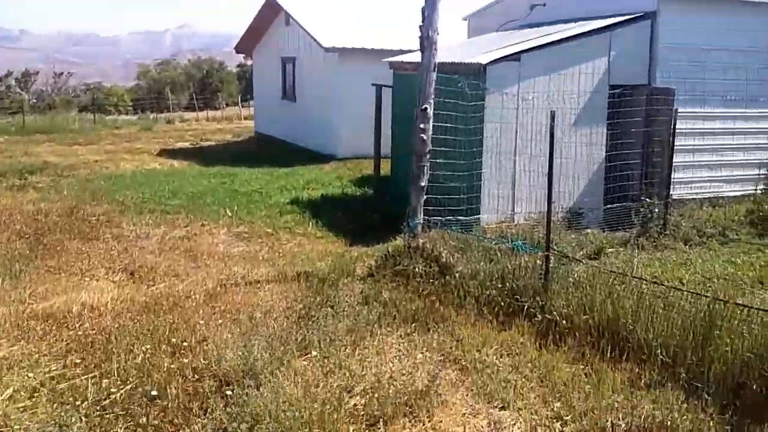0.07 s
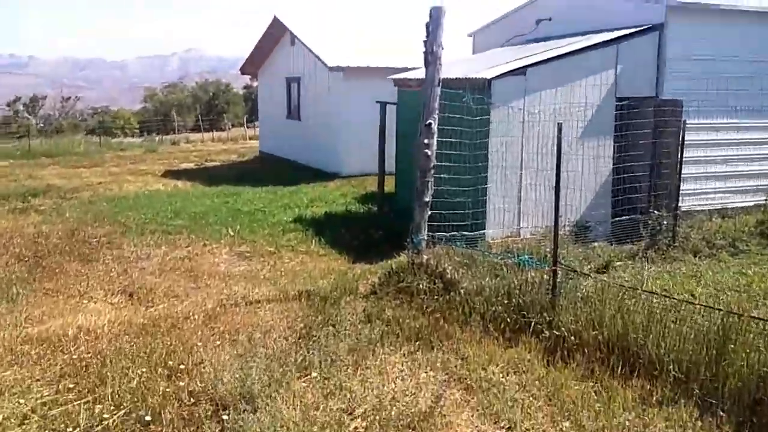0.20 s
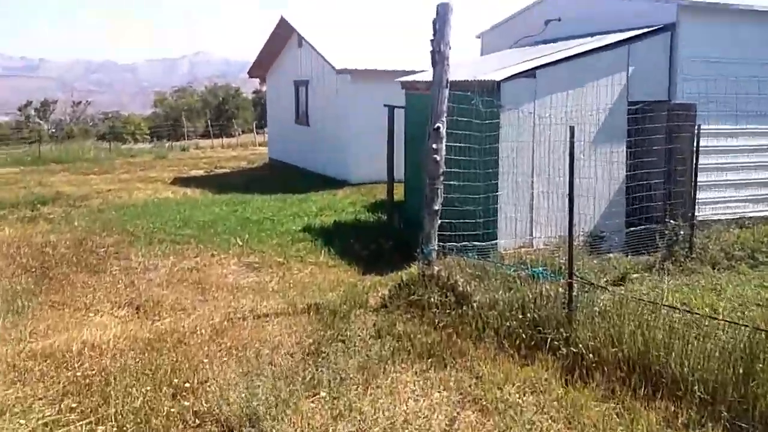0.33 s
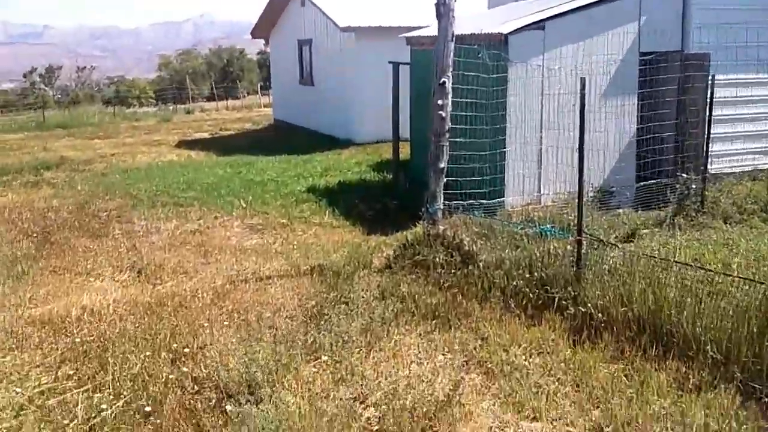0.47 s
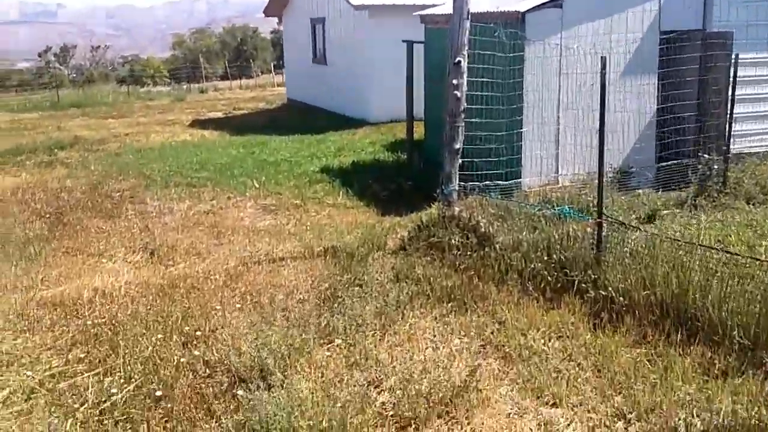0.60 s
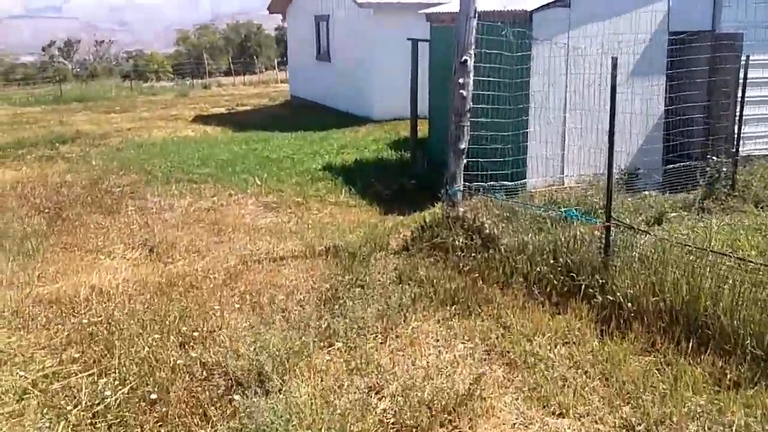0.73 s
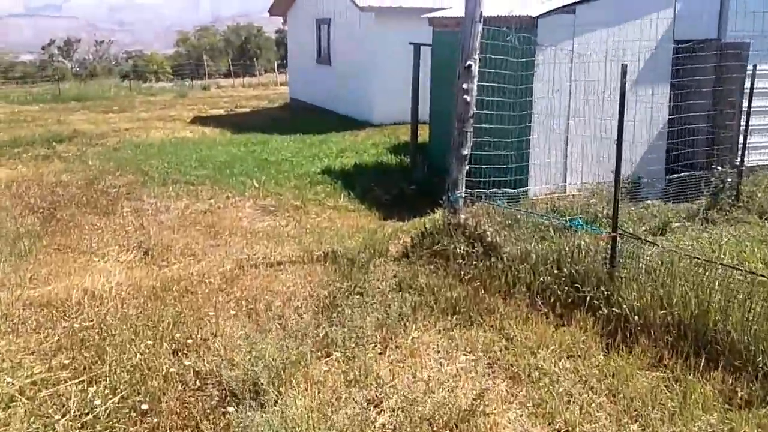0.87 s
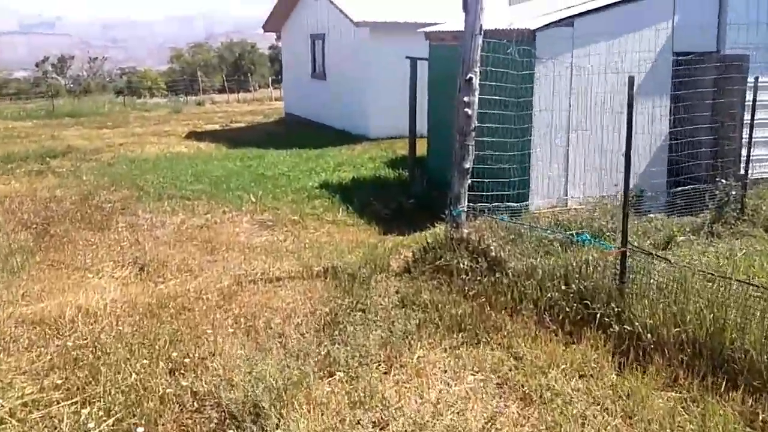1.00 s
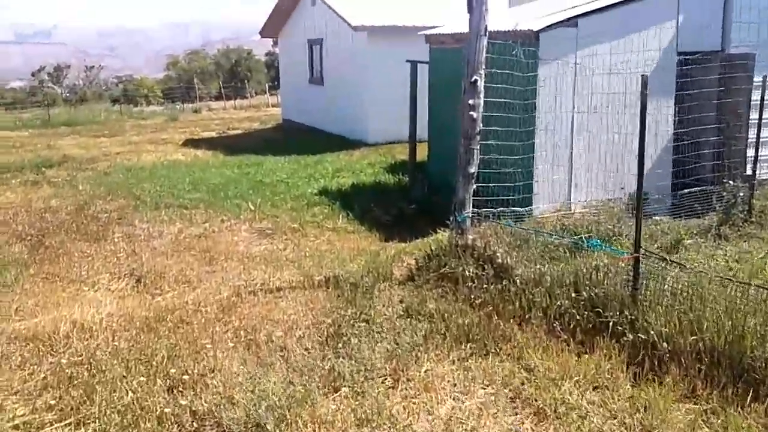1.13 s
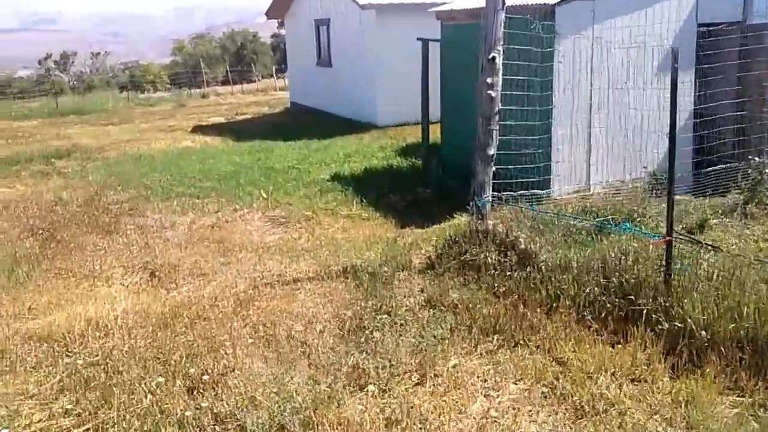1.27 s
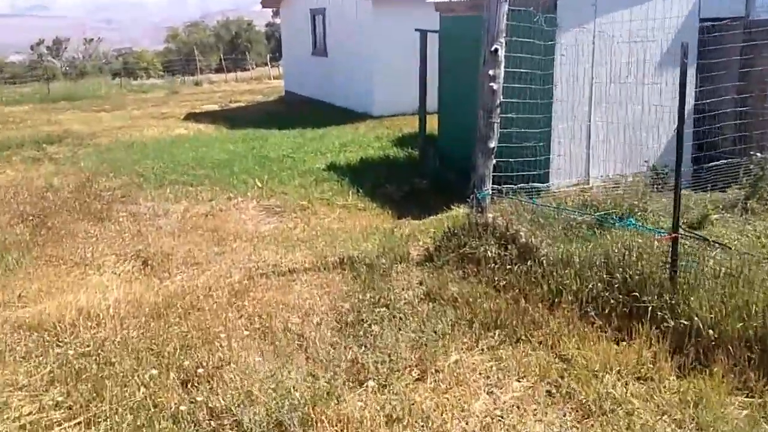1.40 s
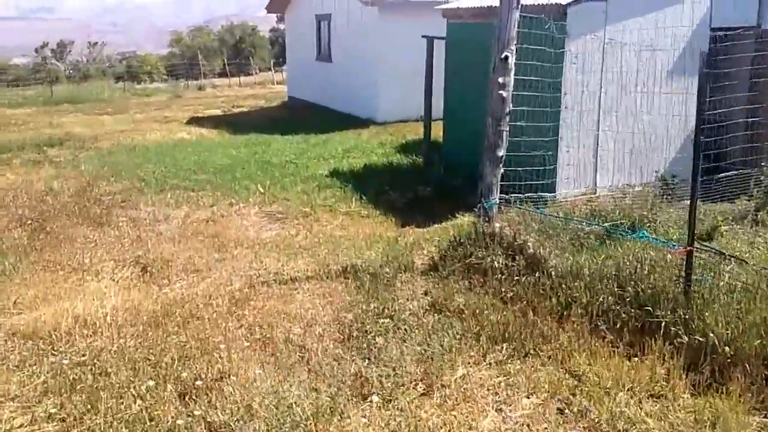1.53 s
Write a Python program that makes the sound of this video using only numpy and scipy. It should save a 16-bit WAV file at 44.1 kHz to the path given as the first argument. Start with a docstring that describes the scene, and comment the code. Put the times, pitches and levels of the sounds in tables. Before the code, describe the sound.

Someone walks through brittle dry grass outdoors, crisp crunches and swishes with soft low bumps

```python
"""An open yard with dry grass: someone walks through it, holding a small camera.
Crunching stems, swishing blades and pressed turf are dense random trains of tiny decaying rings;
snapping stalks and ticking blades are single struck rings with a noisy tearing tail.
The steps bump the camera body in low, sagging pulses, and light wind laps the microphone as low noise.
Far off, a cricket throbs as a noise-modulated tone and a bird gives one rising chirp, over steady air hiss."""
import sys
import numpy as np
from scipy import signal
from scipy.fft import rfft, irfft
from scipy.io import wavfile
from scipy.ndimage import uniform_filter1d

SR = 44100
rng = np.random.default_rng(int(sys.argv[2]) if len(sys.argv) > 2 else 0)


def amplitude_ratio(level_db):
    """Convert a level in decibels to the matching linear amplitude (field) ratio."""
    exponent = np.asarray(level_db, float) / 20
    return 10 ** exponent


def materialize(psi):
    """Save the field psi as 16-bit PCM at rate SR to the path in sys.argv[1].

    A 1-D psi becomes a single channel; in a 2-D psi each row is a channel.
    """
    bounded = np.clip(np.atleast_2d(psi).T, -1, 1)
    quanta = np.round(bounded * 32767).astype(np.int16)
    wavfile.write(sys.argv[1], SR, quanta)


N = 70560

# Spectrum of soles pressing the turf: frequency_hz, density_db (per Hz, relative)
PRESS_SPECTRUM = [(170, -21), (300, -5), (430, -2), (800, 0.5), (1100, -4.5), (1500, -7.5)]
# Spectrum of stems crunching: frequency_hz, density_db (per Hz, relative)
CRUNCH_SPECTRUM = [(700, -13), (1000, -6.5), (1750, 3.5), (2200, 1), (3100, 2), (4000, -4), (4700, -8.5),
                   (5400, -34)]
# Spectrum of blades swishing: frequency_hz, density_db (per Hz, relative)
SWISH_SPECTRUM = [(4300, -19), (5000, -8.5), (5900, -0.5), (7000, -0.5), (7700, -1.5), (9300, -11),
                  (12600, -12.5), (14000, -15.5), (15900, -16)]


def evened(x):
    """Normalisation: scales a signal to unit rms."""
    return x / np.sqrt(np.mean(x ** 2) + 1e-20)


def over_time(table, axis=1):
    """Level envelope: interpolates a dB column linearly in time and turns it into a gain."""
    rows = np.array(table)
    return amplitude_ratio(np.interp(np.arange(N) / SR, rows[:, 0], rows[:, axis]))


def read_spectrum(points, hz):
    """Spectral envelope: interpolates dB over log frequency, with almost nothing outside the points."""
    point_hz, db = np.transpose(points)
    return amplitude_ratio(np.interp(np.log(hz + 1), np.log(point_hz + 1), db, left=-100, right=-100))


def shaped(spectrum, points):
    """Linear filtering: weights a spectrum by an envelope and returns the waveform at unit rms."""
    return evened(irfft(spectrum * read_spectrum(points, np.fft.rfftfreq(N, 1 / SR)), N))


def noise(points):
    """Filtered noise: white Gaussian noise given the spectral envelope."""
    return shaped(rfft(rng.standard_normal(N)), points)


def add(mix, start_s, sound):
    """Superposition: sums a short sound into the mix at its start time."""
    part = mix[max(round(start_s * SR), 0):][:len(sound)]
    part += sound[:len(part)]


def ring(hz, t60_s, rise_cycles=0.36):
    """Damped oscillation: a struck mode with a linear onset and exponential decay of at least 1 ms."""
    t = np.arange(round(0.03 * SR)) / SR
    onset = np.minimum(t * hz / rise_cycles, 1)
    decay = amplitude_ratio(-60 * t / max(t60_s, 1e-3))
    return onset * decay * np.sin(2 * np.pi * hz * t)


def sparse(per_s, spread_db):
    """Random point process: clicks of random sign, mostly small, a few large."""
    size = amplitude_ratio(spread_db * np.minimum(rng.exponential(1, N), 4))
    happens = rng.random(N) < per_s / SR
    return size * happens * rng.choice([-1, 1], N)


def air():
    """Stationary noise: a steady outdoor hiss."""
    # Spectrum of the hiss: frequency_hz, density_db (per Hz, relative)
    air_spectrum = [(300, -24), (7000, 12), (15900, 17)]
    return amplitude_ratio(-65.5) * noise(air_spectrum)


def wind():
    """Turbulent pressure on the microphone: low noise with slow random changes of level."""
    # Wind level: time_s, level_db (rms)
    gust_levels = [(0, -73), (.22, -65), (.72, -63.5), (1.05, -63), (1.6, -59.5)]
    # Spectrum of the wind: frequency_hz, density_db (per Hz, relative)
    wind_spectrum = [(25, -44), (45, -0.5), (70, 5.5), (110, -7.5), (300, -6.5), (400, -81)]
    lump_db = 3  # rms of the level changes
    slow = uniform_filter1d(uniform_filter1d(rng.standard_normal(N), 900), 900)
    lumps = amplitude_ratio(lump_db * evened(slow))
    return over_time(gust_levels) * evened(noise(wind_spectrum) * lumps)


def cricket():
    """Amplitude modulation: a tone with narrow-band noise around it throbs about thirty times a second."""
    # Cricket level: time_s, level_db
    cricket_levels = [(0, -89), (.06, -68), (.15, -65), (.3, -70), (.62, -85), (.7, -86), (.79, -65),
                      (1.39, -80), (1.43, -64), (1.53, -59), (1.55, -74)]
    pitch_hz, pole_width_hz = 5450, 220
    throb_hz, throb_peak_s, throb_depth_db = 30.2, 1.458, 20  # depth from crest to trough
    steady_tone = 1.1  # relative to the rms of the scrape
    t, r = np.arange(N) / SR, np.exp(-np.pi * pole_width_hz / SR)
    complex_noise = rng.standard_normal((N, 2)) @ [1, 1j]
    scrape = signal.lfilter([1], np.convolve([1, -r], [1, -r]), complex_noise)
    scratchy = steady_tone + scrape / np.std(scrape)
    throb = amplitude_ratio(throb_depth_db * np.cos(2 * np.pi * throb_hz * (t - throb_peak_s)) / 2)
    whistle = (scratchy * np.exp(2j * np.pi * pitch_hz * t)).real
    return over_time(cricket_levels) * evened(throb * whistle)


def bird():
    """Frequency modulation: one faint chirp far away, its pitch rising ever faster."""
    start_s, length_s, peak_db = 0.73, 0.045, -63
    from_hz, to_hz = 2950, 3250
    out, u = np.zeros(N), np.linspace(0, 1, round(length_s * SR))
    hz = from_hz + (to_hz - from_hz) * u ** 2
    chirp = np.sin(np.pi * u) * np.sin(2 * np.pi * np.cumsum(hz) / SR)
    add(out, start_s, amplitude_ratio(peak_db) * chirp)
    return out


def bumps():
    """Transient of a jolted body: a low push of a cycle or two whose pitch sags."""
    # Bumps of the camera body: peak_s, peak_db, pitch_hz (at the peak)
    bump_events = [(0.29, -39.5, 95), (0.357, -49, 76), (0.437, -48, 89), (0.628, -38.5, 191),
                   (0.8139, -34, 101), (1.182, -43, 75), (1.24, -44, 95), (1.301, -49, 81),
                   (1.385, -50, 67)]
    rise_cycles, fall_cycles = 0.34, 0.87  # Gaussian widths before and after the peak
    sag = 0.64  # difference between early and late pitch limits, as a share of pitch_hz
    out, lead_s = np.zeros(N), 0.03
    for peak_s, peak_db, pitch_hz in bump_events:
        u = (np.arange(round(0.1 * SR)) / SR - lead_s) * pitch_hz  # cycles from the peak
        shape = np.exp(-(u / np.where(u < 0, rise_cycles, fall_cycles)) ** 2 / 2)
        phase = u - sag * u * np.tanh(u / 2) / 2
        add(out, peak_s - lead_s, amplitude_ratio(peak_db) * shape * np.cos(2 * np.pi * phase))
    return out


def struck_pair(hz, t60_s, rise_cycles, overtone_ratio, overtone_db, overtone_rise_cycles):
    """Modal synthesis: a fundamental and one inharmonic overtone, scaled to unit peak."""
    fundamental = ring(hz, t60_s, rise_cycles)
    overtone = ring(hz * overtone_ratio, t60_s, overtone_rise_cycles)
    pair = fundamental + amplitude_ratio(overtone_db) * overtone
    return pair / abs(pair).max()


def breaks():
    """Brittle fracture: single stalks snap and blades tick as rings, each with a short tearing tail."""
    # Thick stalks snapping: start_s, peak_db, pitch_hz, t60_s, overtone_db (relative to fundamental)
    snap_events = [(.3848, -31, 594, 0.0063, -12), (.3846, -32, 1930, 0.0036, -6),
                   (0.4355, -13, 1750, 0.004, -4), (0.4368, -24, 430, 0.02, 2),
                   (0.4505, -18, 1500, 0.003, 0), (0.5028, -29, 1680, .004, -2),
                   (0.5078, -30.5, 1100, 0.004, -3), (.5298, -31, 850, 0.005, -12),
                   (.5687, -31, 1320, 0.0065, -15), (.6464, -30, 1610, 0.006, -1),
                   (0.6884, -28, 1900, 0.004, 5), (0.9243, -26, 1500, 0.0028, -5),
                   (1.1526, -25, 1220, 0.0087, -20), (1.1690, -25, 1260, 0.0057, -20),
                   (1.2515, -25, 700, 0.0046, -1), (1.3233, -28, 1400, 0.002, -8),
                   (1.4303, -32, 1750, 0.002, -12)]
    # Thin blades ticking: start_s, peak_db, pitch_hz, overtone_db (relative to fundamental)
    tick_events = [(0.0108, -31, 7060, 1), (0.0197, -33, 7260, -1), (0.1006, -34.5, 7200, -7),
                   (.2212, -28.5, 6960, -12), (0.2490, -33, 5700, -12), (0.4378, -28, 6500, -20),
                   (.2589, -26.5, 6960, -12), (0.375, -32, 7140, -9), (.3842, -28.5, 6540, -16),
                   (.4745, -31, 7100, -20), (0.639, -43, 7350, 11), (0.8443, -39, 5860, -11),
                   (0.9184, -25.5, 7050, -14), (0.9622, -28, 5930, -14), (1.3243, -40, 6550, 7),
                   (1.4028, -38, 7860, -10)]
    snap_ratio, snap_rise_cycles = 1.915, 0.69
    tick_ratio, tick_rise_cycles, tick_t60_s = 1.77, 2.8, 0.0026
    tear_db, tear_t60_s = -20, 0.021  # initial level relative to the peak of the break
    out, low, high = np.zeros(N), np.zeros(N), np.zeros(N)
    # fibres tear for a moment after each break
    tail = amplitude_ratio(tear_db - 60 * np.arange(round(0.03 * SR)) / SR / tear_t60_s)
    for start_s, peak_db, pitch_hz, t60_s, overtone_db in snap_events:
        snap = struck_pair(pitch_hz, t60_s, snap_rise_cycles, snap_ratio, overtone_db, 2 * snap_rise_cycles)
        add(out, start_s, amplitude_ratio(peak_db) * snap)
        add(low, start_s, amplitude_ratio(peak_db) * tail)
    for start_s, peak_db, pitch_hz, overtone_db in tick_events:
        tick = struck_pair(pitch_hz, tick_t60_s, tick_rise_cycles, tick_ratio, overtone_db, tick_rise_cycles)
        add(out, start_s, amplitude_ratio(peak_db) * tick)
        add(high, start_s, amplitude_ratio(peak_db) * tail)
    stalk_tearing = low * noise([*PRESS_SPECTRUM[:4], *CRUNCH_SPECTRUM[1:]])
    blade_tearing = high * noise(SWISH_SPECTRUM)
    return out + stalk_tearing + blade_tearing


def grains(points, per_s, spread_db, cycles, hiss_share, clumps, cracks, count=24):
    """Granular synthesis: countless tiny breaks ring at varied pitches, with cracks and plain hiss."""
    crack_share = 0.18  # of the power, as is hiss_share
    size = sparse(per_s, spread_db)
    kind, out = rng.integers(0, count, N), np.zeros(N)
    for k, hz in enumerate(np.geomspace(points[1][0], points[-2][0], count)):
        grain = ring(hz, 3 * cycles / hz)  # falls 20 dB in these cycles, unless the 1 ms floor holds
        grain = grain * np.sqrt(hz) / np.linalg.norm(grain)
        out += signal.oaconvolve(size * (kind == k), grain)[:N]
    # flatten the broad spectrum, then give it the wanted envelope
    spectrum = rfft(out)
    flat = spectrum / np.sqrt(uniform_filter1d(abs(spectrum) ** 2, size=N // 60) + 1e-9)
    ringing = shaped(flat, points)
    cracking = shaped(rfft(cracks), points)
    broken = np.sqrt(1 - crack_share) * ringing + np.sqrt(crack_share) * cracking
    texture = np.sqrt(1 - hiss_share) * broken + np.sqrt(hiss_share) * noise(points)
    return evened(texture * clumps)


def grass():
    """Shared excitation: press, crunch and swish share the clumps and cracks of breaking stems."""
    # Levels of the walk: time_s, press_db, crunch_db, swish_db
    walk_levels = [(0, -66, -57.5, -59), (0.12, -79, -71, -65), (0.182, -65.5, -59.5, -52.5),
                   (0.196, -51.5, -44.5, -48.5), (0.25, -62.5, -44, -42), (0.29, -65, -53, -52.5),
                   (0.35, -70, -59, -55.5), (0.385, -54.5, -46.5, -47), (0.425, -42, -36.5, -41),
                   (0.47, -44.5, -36.5, -42), (0.5, -48, -45, -45), (0.61, -62.5, -58.5, -58),
                   (0.66, -62.5, -49, -51.5), (0.71, -58, -52.5, -57.5), (0.77, -70, -63, -61.5),
                   (0.86, -60, -53.5, -53.0), (0.92, -55.5, -47, -50), (1.02, -58, -44, -44.5),
                   (1.064, -63, -51.5, -49), (1.076, -63, -49, -48.5), (1.16, -53, -47.5, -44),
                   (1.255, -50, -45, -44.5), (1.305, -63, -51.5, -49), (1.38, -62, -54.5, -52.5),
                   (1.46, -67, -63.0, -59.5), (1.53, -65, -62.5, -58.5), (1.57, -58, -57.5, -53),
                   (1.599, -66, -61, -53.5)]
    clump_s, clump_db = 0.01, 2  # stems give way in clumps: averaging time, rms of the level changes
    cracks_per_s, cracks_spread_db, cracks_t60_s = 320, 2.2, 0.006
    slow = uniform_filter1d(rng.standard_normal(N), round(clump_s * SR))
    clumps = amplitude_ratio(clump_db * evened(slow))
    # short wide-band cracks: noise under decaying envelopes
    decay = amplitude_ratio(-60 * np.arange(round(0.02 * SR)) / SR / cracks_t60_s)
    bursts = signal.oaconvolve(abs(sparse(cracks_per_s, cracks_spread_db)), decay)[:N]
    cracks = bursts * rng.standard_normal(N)
    press = grains(PRESS_SPECTRUM, per_s=700, spread_db=2.5, cycles=3.3, hiss_share=0.8,
                   clumps=clumps, cracks=cracks, count=12)
    crunch = grains(CRUNCH_SPECTRUM, per_s=1800, spread_db=3.3, cycles=3, hiss_share=0.3,
                    clumps=clumps, cracks=cracks)
    swish = grains(SWISH_SPECTRUM, per_s=5000, spread_db=1.5, cycles=1, hiss_share=0.4,
                   clumps=clumps, cracks=cracks)
    out = over_time(walk_levels, axis=1) * press
    out += over_time(walk_levels, axis=2) * crunch
    out += over_time(walk_levels, axis=3) * swish
    return out


def scene():
    """Superposition at one microphone in the open air, whose low end rolls off."""
    mix = air() + wind() + cricket() + bird() + bumps() + breaks() + grass()
    low_cut = signal.butter(2, 40, "high", fs=SR, output="sos")
    return signal.sosfilt(low_cut, mix)[None]


def band_limit(x):
    """A steep low-pass at the top of the band."""
    return signal.sosfilt(signal.butter(12, 16200, fs=SR, output="sos"), x)


def record(dry):
    """Signal chain: the finished mix goes to its last stage with its level unchanged."""
    return band_limit(dry)


dry = scene()
out = record(dry)
materialize(out)
```